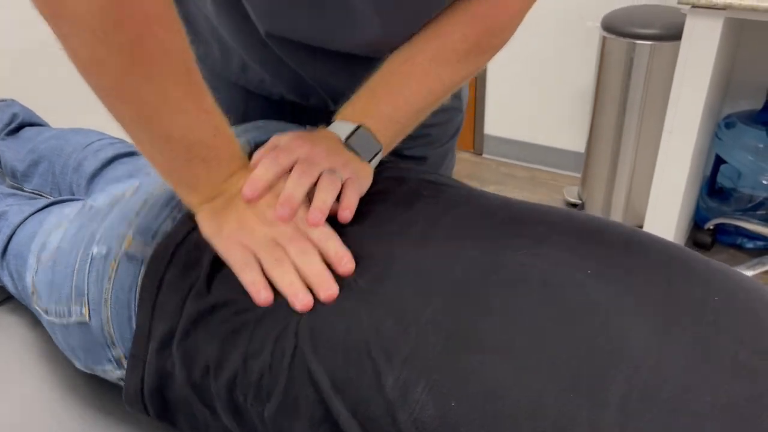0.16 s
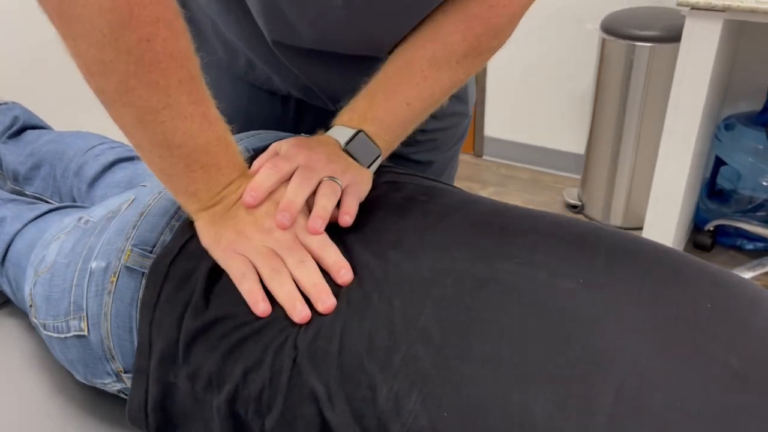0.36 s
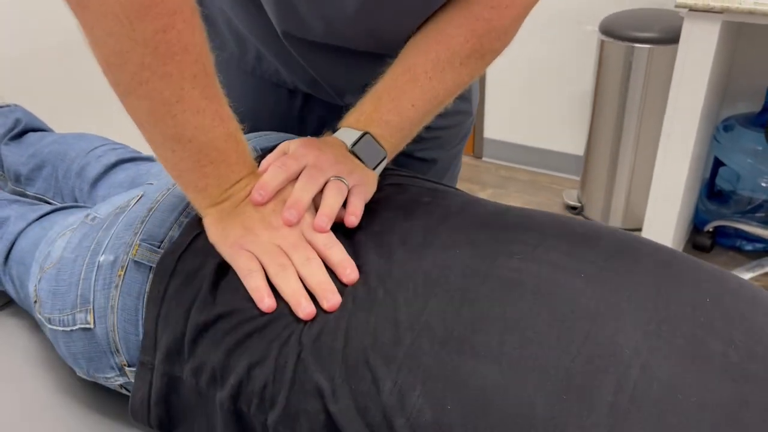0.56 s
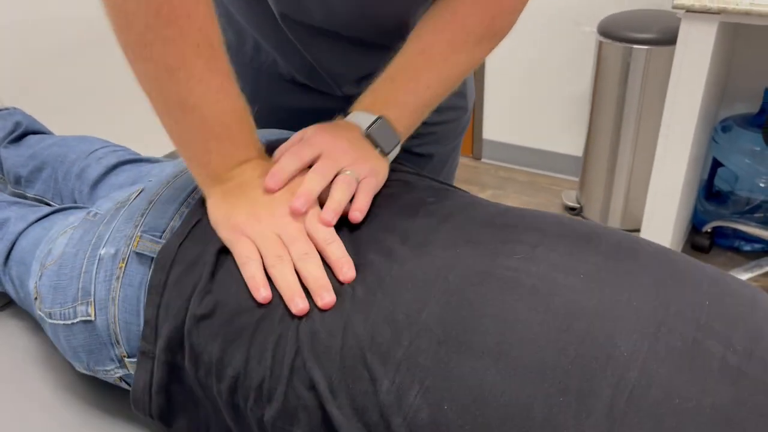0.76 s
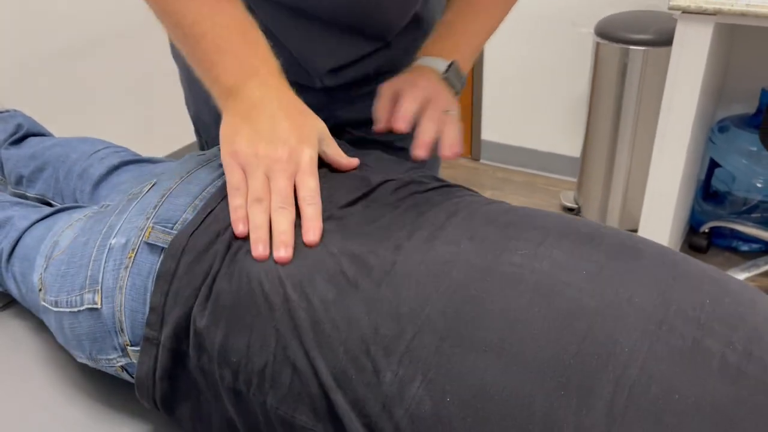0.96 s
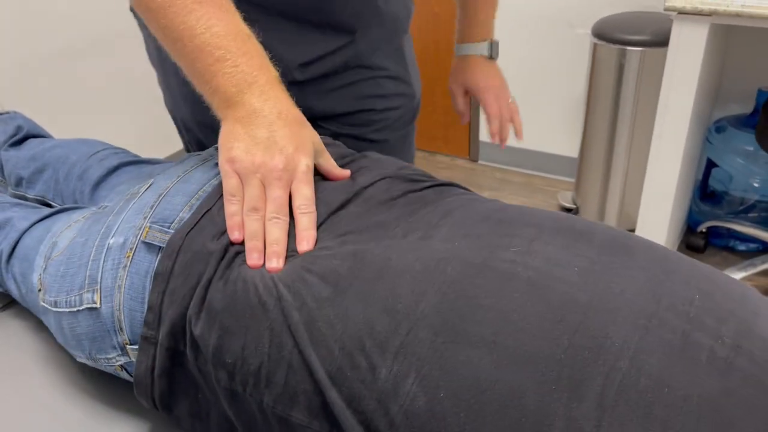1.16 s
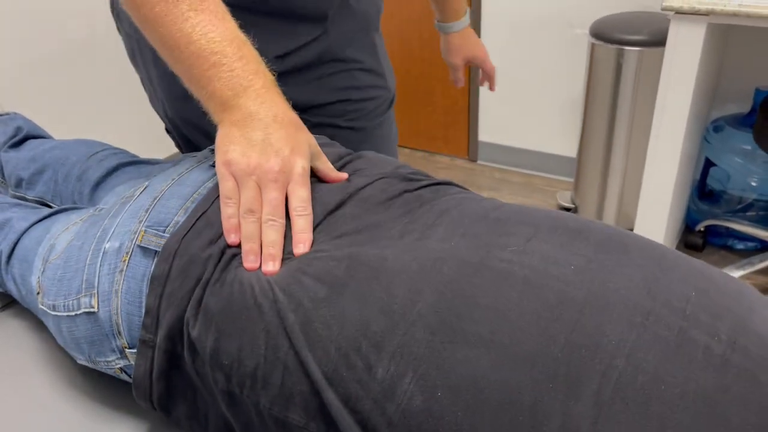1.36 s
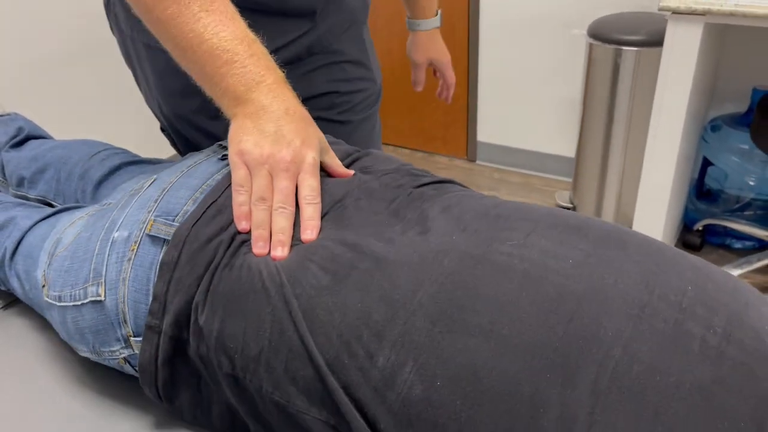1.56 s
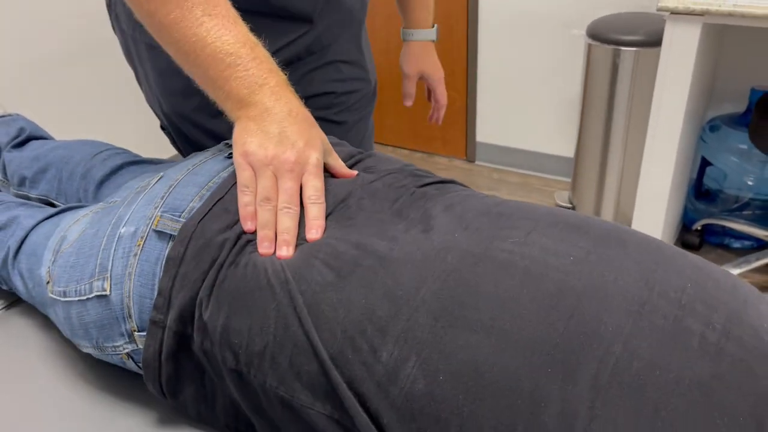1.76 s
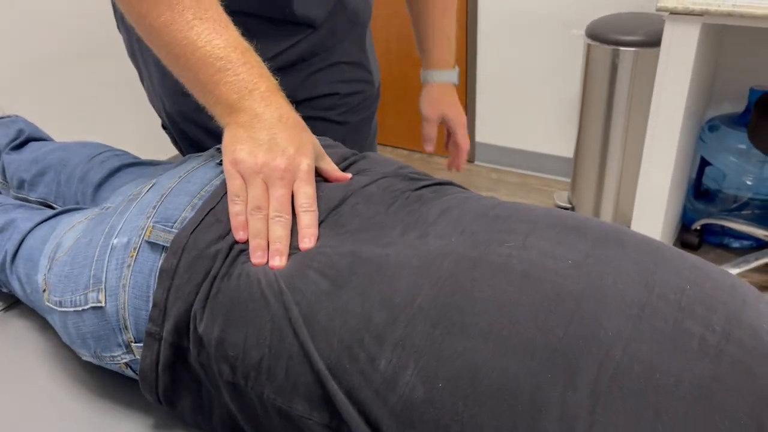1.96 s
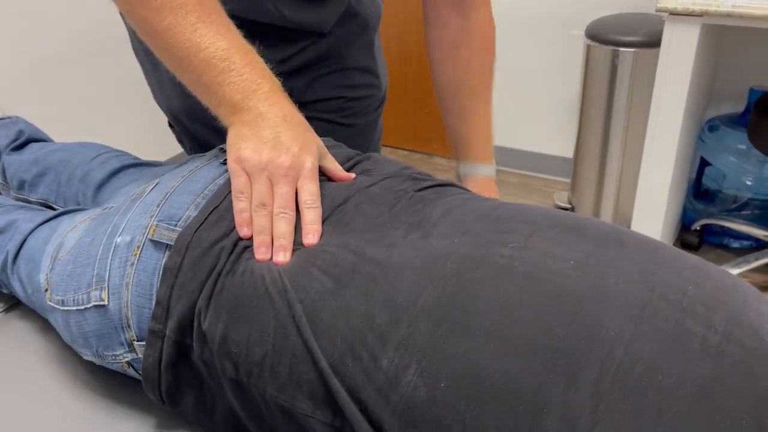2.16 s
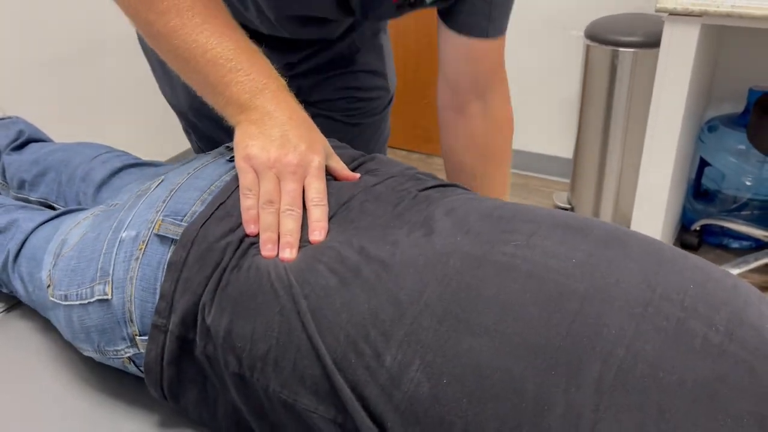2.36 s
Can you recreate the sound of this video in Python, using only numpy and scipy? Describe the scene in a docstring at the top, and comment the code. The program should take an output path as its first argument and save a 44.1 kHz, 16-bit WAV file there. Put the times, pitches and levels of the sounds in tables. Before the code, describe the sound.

A padded treatment table section drops with one loud sharp knock, then light taps and rustling.

```python
"""The drop section of a padded treatment table falls onto its stop with one loud knock and rebounds, in a small hard
room: smooth pushes ring the frame, a metal latch chatters in clicks and a lighter tap bounces later.
Small ticks are click bursts, some dry, some mostly room echo; rustle is grainy noise with a moving scrape resonance.
A low tone near 57 Hz, machine hum with the rebound's low thump, lies beneath with rumble and room air.
All is heard by a phone with two microphone ports."""
import sys
import numpy as np
from scipy import signal
from scipy.fft import rfft, irfft
from scipy.io import wavfile
from scipy.ndimage import uniform_filter1d

SR = 44100
rng = np.random.default_rng(int(sys.argv[2]) if len(sys.argv) > 2 else 0)


def to_wav(sig):
    """Store sig (one row per channel, or 1-D mono) as 16-bit WAV at the path in sys.argv[1].

    Samples outside -1..1 are clipped; the rate is SR.
    """
    pcm = np.clip(np.atleast_2d(sig), -1, 1) * 32767
    pcm = np.round(pcm).astype(np.int16)
    wavfile.write(sys.argv[1], SR, pcm.T)  # frames by channels


N = 105840


def amp(db):
    """Decibels to amplitude factor."""
    return 10 ** (np.asarray(db) / 20)


def evened(x):
    """Scale to rms 1."""
    return x / np.sqrt(np.mean(x ** 2) + 1e-20)


def read(points, hz):
    """Read a curve of (frequency [Hz], value) along a log frequency axis."""
    f, value = np.transpose(points)
    return np.interp(np.log(hz + 1), np.log(f + 1), value)


def add(mix, s, sound):
    """Add a sound at s seconds, cut at the end of the mix."""
    part = mix[round(s * SR):][:len(sound)]
    part += sound[:len(part)]


def coloured(x, spectrum):
    """Noise given a spectrum, silent up to its first point, rms 1."""
    hz = np.fft.rfftfreq(x.shape[-1], 1 / SR)
    gain = amp(read(spectrum, hz)) * (hz > spectrum[0][0])
    return evened(irfft(rfft(x) * gain, x.shape[-1]))


def click(spectrum):
    """The shortest causal (minimum-phase) click with this spectrum, peak 1."""
    hz = abs(np.fft.fftfreq(4096, 1 / SR))
    log_gain = np.log(amp(np.maximum(read(spectrum, hz), -70)))
    x = np.fft.ifft(np.exp(np.conj(signal.hilbert(log_gain)))).real[:2048]
    return x / abs(x).max()


def burst(spectrum, t60):
    """A click followed by a dying scatter of clicks of random size and sign."""
    t = np.arange(2048) / SR
    sparse = rng.standard_normal(2048) * (rng.random(2048) < .06)
    train = sparse * amp(-1.0 - 60 * t / t60)
    return signal.fftconvolve(click(spectrum), train + (t == 0))


def ring(modes):
    """Struck resonances: a sum of dying sines of alternate sign, peak 1."""
    t = np.arange(SR // 2) / SR
    x = np.zeros(len(t))
    for k, (hz, db, t60) in enumerate(modes):
        x += (-1) ** k * amp(db - 60 * t / t60) * np.sin(2 * np.pi * hz * t)
    return x / abs(x).max()


def background():
    """A low tone of wandering pitch and set level, noise rumble below 90 Hz and the wider noise of room air."""
    # level near 57 Hz: machine hum, ducked after the knock, with the rebound's low thump:
    # (time [s], level [dB])
    low_level = [(0, -46.5), (.3, -35), (.38, -57), (.49, -39), (.7, -47.5), (.8, -45.5), (1.26, -44.5),
                 (1.45, -51), (1.55, -51), (1.65, -55.5), (1.72, -47), (1.8, -50.5), (1.88, -45),
                 (1.95, -46.5), (2.02, -45), (2.24, -44.5), (2.31, -49), (2.4, -44)]
    # room air spectrum: (frequency [Hz], relative level [dB per Hz])
    air_spectrum = [(70, -3.5), (91, -28.5), (123, -13.5), (150, -23.5), (260, -25.5), (372, -31),
                    (600, -45), (1000, -56), (1400, -59), (2800, -56), (4000, -65.5), (6500, -74.5),
                    (8800, -59), (11000, -67.5), (12500, -78.5)]
    low_hz, low_waver_hz = 56.9, 0.58  # centre and rms wander
    rumble_db, air_db = -68, -54.5
    t = np.arange(N) / SR
    waver = evened(uniform_filter1d(uniform_filter1d(rng.standard_normal(N), 4000), 4000))
    phase = 2 * np.pi * np.cumsum(low_hz + low_waver_hz * waver) / SR
    low_tone = np.sqrt(2) * np.sin(phase) * amp(np.interp(t, *np.transpose(low_level)))
    rumble = coloured(rng.standard_normal(N), [(15, 0.5), (40, 1.5), (70, 7), (90, -40)])
    air = coloured(rng.standard_normal((2, N)), air_spectrum)
    return low_tone + amp(rumble_db) * rumble + amp(air_db) * air


def rustle():
    """Grainy noise of cloth and the creaking pad with a moving scrape resonance; its treble follows its own
    tilt."""
    # clothing movement, with creak and hiss of the pad near 0.03 to 0.15 s and 0.5 to 0.75 s: (time [s], level
    # [dB], relative treble [dB], scrape centre [Hz], relative scrape [dB])
    movement = [(0, -68.5, -10, 705.2, 3.5), (.05, -68, 4.5, 700, 13), (0.171, -65.5, -2.5, 698.7, -4.5),
                (0.361, -56.5, -4.5, 1396, 1), (0.498, -52.5, -5.5, 1398, -1.5),
                (0.579, -60.5, -3, 1400, 2), (.7, -65.5, -3, 1350, -1.5), (0.801, -56.5, -17.5, 798, -3),
                (.9, -60, -0.5, 1300, 9.5), (1.07, -65.5, 0.5, 1300, -35), (1.2, -66.5, -6, 1300, -3),
                (1.26, -66, -5, 3800, -36.5), (1.275, -60, -8, 3800, -3.5), (1.29, -55.5, -11, 3684, -21.5),
                (1.3, -57.5, -9, 1200, -8.5), (1.345, -60, -3.5, 1700, 1.5), (1.375, -61, -5.5, 1700, -7),
                (1.395, -52.5, -7.5, 1700, -8), (1.44, -60, -6, 1700, -6), (1.475, -64, -3.5, 1800, -7.5),
                (1.494, -63, 2.5, 2697, -3), (1.512, -57, -1.5, 2700, -2), (1.528, -56, -3, 2600, -5),
                (1.55, -54.5, -2, 2000, -2), (1.6, -61.5, -2, 2600, -10), (1.7, -79, -6.5, 2000, -6.5),
                (1.9, -88.5, 5, 1300, 6), (2.0, -85, 13, 1500, 3), (2.03, -74, 0, 1540, -5),
                (2.13, -73.5, -16, 1600, -7.5), (2.2, -67, 0, 1550, 0.5), (2.25, -69.5, 1, 1500, 5.5),
                (2.262, -54.5, -7.5, 2100, -9), (2.32, -63, -8.5, 1550, -5), (2.4, -68, -0.5, 1500, 1.5)]
    # body and treble of the cloth: (frequency [Hz], relative level [dB per Hz])
    cloth = [(350, -3), (600, -2), (834, -10.5), (1120, -3.5), (1730, -5), (2040, -8.5), (2730, -9.5),
             (6500, -14), (8450, -39.5), (14300, -120)]
    sheen = [(3530, -40), (6000, -18.5), (7210, -3.5), (9000, 1.5), (10200, 5.5), (11200, -1.5),
             (12500, -31.5), (16200, -42), (22000, -120)]
    scrape_width_hz = 600
    s, db, tilt_db, hz, scrape_db = np.transpose(movement)
    t = np.arange(N) / SR
    grain = amp(1.55 * evened(uniform_filter1d(rng.standard_normal(N), 150)))  # swings 1.55 dB rms
    low, high, mid = rng.standard_normal((3, 2, N)) * grain
    # low-passed noise is carried up to the moving centre by a turning phase
    turn = np.exp(2j * np.pi * np.cumsum(np.interp(t, s, hz)) / SR)
    r = np.exp(-np.pi * scrape_width_hz / SR)
    smooth = signal.lfilter([1], np.convolve([1, -r], [1, -r]), mid)
    scrape = evened((turn * smooth).real)
    both = coloured(low, cloth) + amp(np.interp(t, s, scrape_db)) * scrape
    both = both + coloured(high, sheen) * amp(np.interp(t, s, tilt_db))
    return both * amp(np.interp(t, s, db))


def room(x):
    """Sparse echoes of random sign, each band dying at its own speed, another tail for each channel."""
    # hard room: (frequency [Hz], 60 dB decay time of the late tail [s])
    decay = [(60, 0.36), (110, .8), (250, 1), (500, 0.85), (1000, .7), (2000, 0.6), (4000, .75),
             (8000, .75), (12000, 0.57)]
    early_db, early_share = 12, .42  # early part: extra level, share of the late decay time
    delay_s = .003
    echoes = np.zeros((2, SR))
    at = np.arange(0, SR - 20, 20) + rng.integers(0, 20, (2, SR // 20 - 1))
    np.put_along_axis(echoes, at, rng.choice([-1., 1.], at.shape), 1)
    band_hz, band_t60 = np.transpose(decay)
    t = np.arange(SR) / SR
    hz, tail = np.fft.rfftfreq(SR, 1 / SR), 0
    for k, t60 in enumerate(band_t60):
        share = np.interp(np.log(hz + 1), np.log(band_hz), np.arange(len(band_hz)) == k)
        late = amp(-60 * t / t60)
        early = amp(early_db - 60 * t / t60 / early_share)
        tail = tail + irfft(rfft(echoes) * share, SR) * (late + early) / np.sqrt(t60)
    tail = np.pad(tail, ((0, 0), (round(delay_s * SR), 0)))
    return signal.fftconvolve(x[None], tail / np.linalg.norm(tail[0]), axes=1)[:, :N]


def ticks():
    """Millisecond bright snaps made of click bursts, as heard directly and as sent to the room."""
    # small ticks, some dry, some mostly room echo:
    # (time [s], direct level [dB], room send relative to the direct tick [dB])
    tick_events = [(0.03, -57.5, 19), (.595, -42.5, 3.5), (.7462, -21, -5), (0.7481, -35.5, 9),
                   (0.7518, -33, -10.5), (0.7896, -31, -3.5), (0.8519, -35.5, 7), (1.039, -43.5, 7),
                   (1.8728, -44, 3.5), (1.99, -63, 5.5), (2.0949, -55, 15), (2.1964, -56.5, -13.5),
                   (2.2522, -46.5, -12.5)]
    # tick spectrum: (frequency [Hz], relative level [dB per Hz])
    tick_spectrum = [(600, -48), (1200, -21.5), (2000, -8), (3500, -21), (5500, -12.5), (7000, -13.5),
                     (8300, 1.5), (9500, -2.5), (11100, 4.5), (12000, -8), (12800, -23)]
    out = np.zeros((2, N))
    for s, db, send_db in tick_events:
        snap = burst(tick_spectrum, 0.0023)
        add(out[0], s, amp(db) * snap)
        add(out[1], s, amp(db + send_db) * snap)
    return out


def table():
    """Each blow is a smooth push into the ringing frame; the metal latch cracks and a tap bounces."""
    # blows on the frame: (time [s], level [dB], contact time [ms])
    blows = [(0.017, -23.5, 2.52), (.034, -23, 2.27), (0.193, -23, 0.87), (0.194, -13.5, 4.1),
             (0.203, 2.5, 1), (0.208, 1.5, 4.28), (0.245, -11.5, 2.8), (0.286, -12.5, 1.86),
             (0.401, -20, 2), (.452, -18.5, 2.3), (0.479, -19, 2.34), (0.529, -14.5, 6.2)]
    # frame resonances: (frequency [Hz], relative level [dB], 60 dB decay time [s])
    frame_modes = [(62, -20, .15), (114.4, -16, 0.16), (160.8, -6.5, 0.032), (196, 2.5, 0.035),
                   (266.7, -6, 0.078), (362.1, -3.5, 0.049), (448.5, -14, 0.24), (474, -5, 0.028),
                   (563, 1.5, 0.018), (683, -1, 0.018), (776, -16, 0.056), (890, -16, 0.055),
                   (976, -10.5, 0.05), (1417, -14, .03)]
    # the latch chatters: (time [s], level [dB])
    latch_hits = [(.189, -34), (0.192, -29.5), (.197, -26), (.2022, -1), (.2045, -12), (.209, -10),
                  (.218, -9.5)]
    # a lighter, brighter tap bounces: (time [s], level [dB])
    tap_hits = [(0.8449, -34.5), (.848, -20), (.853, -38), (.868, -29)]
    # latch and tap spectra: (frequency [Hz], relative level [dB per Hz])
    latch_spectrum = [(350, -38), (600, 4.5), (1100, -8), (1440, -2), (1740, -9.5), (2080, -10.5),
                      (3740, -19), (8870, -22.5), (10100, -22.5), (11300, -19.5), (12500, -30.5),
                      (16200, -61.5), (22000, -120)]
    tap_spectrum = [(120, -6.5), (200, -14), (409, -1), (580, -9.5), (658, -13), (878, -16), (1250, -13),
                    (1730, -13.5), (2330, -35), (4000, -42), (5200, -81), (8800, -120)]
    out, frame = np.zeros(N), ring(frame_modes)
    for s, db, ms in blows:
        contact = np.clip(np.arange(300) / SR / (ms / 1000), 0, 1)
        push = np.sin(np.pi * contact) ** 2
        add(out, s, amp(db) * signal.fftconvolve(frame, push / push.sum()))
    for s, db in latch_hits:
        add(out, s, amp(db) * burst(latch_spectrum, .03))
    for s, db in tap_hits:
        add(out, s, amp(db) * click(tap_spectrum))
    return out


def scene():
    """Table and ticks, heard directly and through the room, over rustle and background."""
    knocks, (snaps, sent) = table(), ticks()
    return knocks + snaps + room(knocks + sent) + rustle() + background()


def two_ports(dry):
    """Two microphone ports share part of the sound and differ in phase and level across frequency."""
    # likeness of the ports' diffuse sound: (frequency [Hz], coherence [0 to 1])
    likeness = [(60, 0.95), (200, 0.91), (500, 0.58), (1200, 0.13), (3000, 0.46), (6000, .7), (8500, 0.74),
                (12000, .995)]
    # phase of left ahead of right: (frequency [Hz], lead [rad])
    lead = [(50, 0), (600, .3), (900, -.6), (1300, -2.6), (2240, -5.6), (3600, -5.4), (6720, -6.0),
            (8600, -2 * np.pi), (9390, -7.7), (10280, -3 * np.pi), (11200, -11.5), (12400, -4 * np.pi)]
    # balance: (frequency [Hz], left minus right [dB])
    balance = [(60, 0.64), (170, -0.5), (500, 3.5), (1460, 0.5), (4210, 2.5), (8000, 2.5), (10000, -2.5),
               (12200, 1.5)]
    hz, (a, b) = np.fft.rfftfreq(N, 1 / SR), rfft(dry)
    width = np.arccos(np.clip(read(likeness, hz), 0, 1)) / 2
    turn = np.exp(.5j * read(lead, hz)) * amp(read(balance, hz) / 2)
    mid, side = (a + b) / 2, (a - b) / 2 * np.tan(width)
    return irfft(np.array([(mid + side) * turn, (mid - side) / turn]), N)


def gain_control(ports):
    """Loud sound turns both ports down by 0.13 dB for each dB above a -8 dB threshold."""
    power = uniform_filter1d((ports ** 2).mean(0), 400, origin=199)
    power_db = 10 * np.log10(abs(power) + 1e-12)
    fall = np.arange(N) * 25.0 / SR  # the held level falls 25 dB a second
    held_db = np.maximum.accumulate(power_db + fall) - fall
    over_db = np.maximum(held_db + 8, 0)
    return ports / amp(0.13 * uniform_filter1d(over_db, 600, origin=299))


def record(dry):
    """The phone's two ports, then gain control, soft clip and band limit."""
    edge_hz = 12150
    clipped = np.tanh(gain_control(two_ports(dry)))
    low_pass = signal.firwin(255, edge_hz, window=("kaiser", 9), fs=SR)
    return signal.oaconvolve(clipped, low_pass[None], "same")


dry = scene()
out = record(dry)
to_wav(out)
```